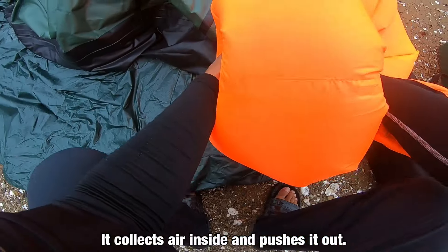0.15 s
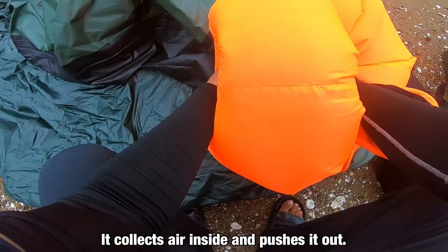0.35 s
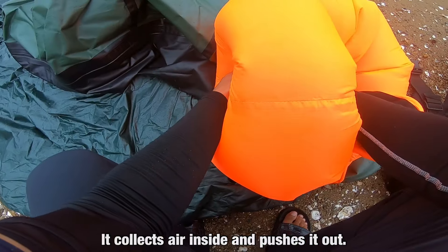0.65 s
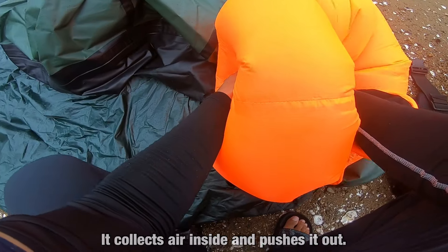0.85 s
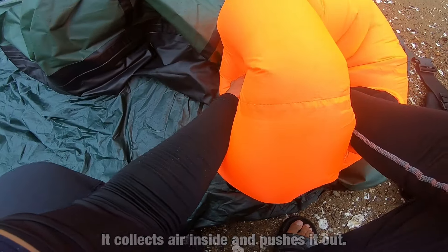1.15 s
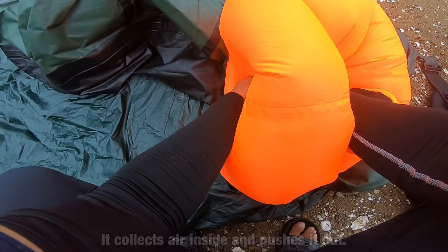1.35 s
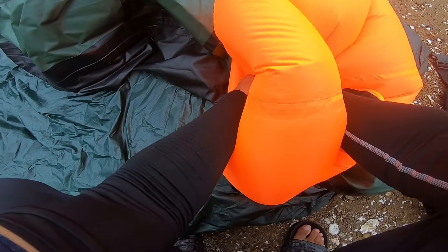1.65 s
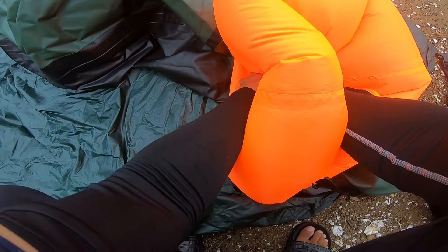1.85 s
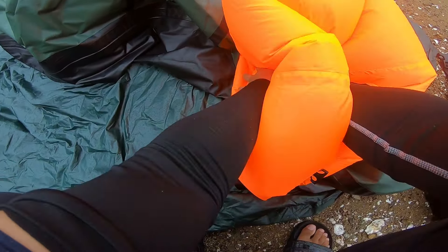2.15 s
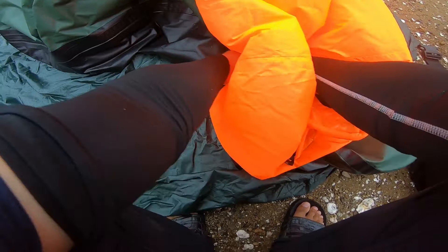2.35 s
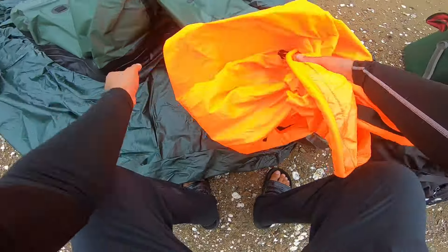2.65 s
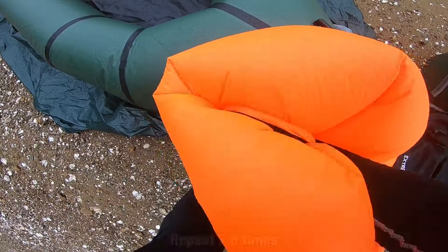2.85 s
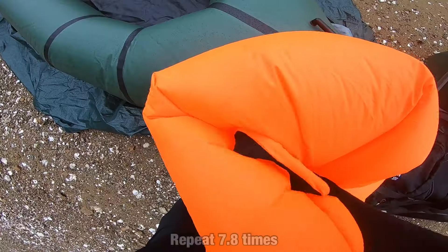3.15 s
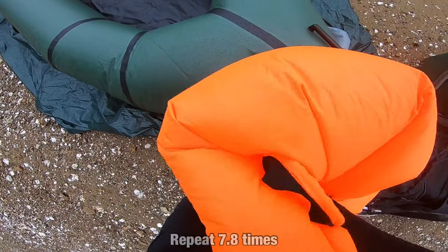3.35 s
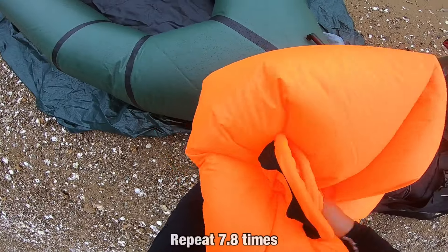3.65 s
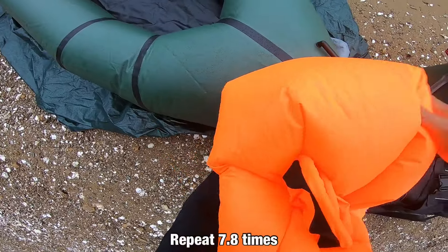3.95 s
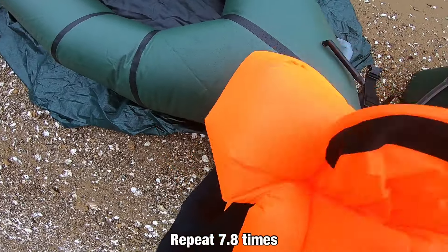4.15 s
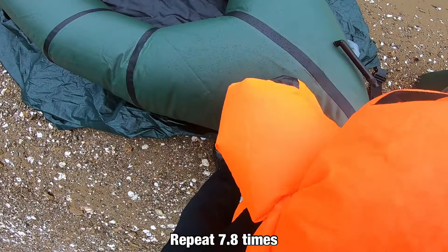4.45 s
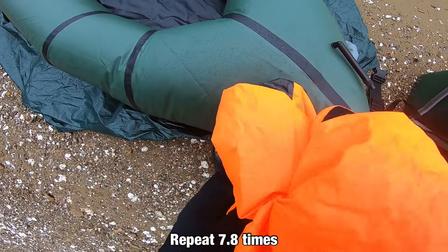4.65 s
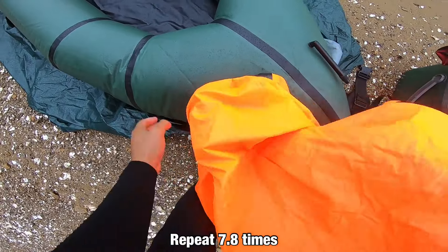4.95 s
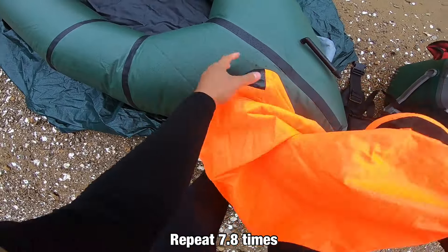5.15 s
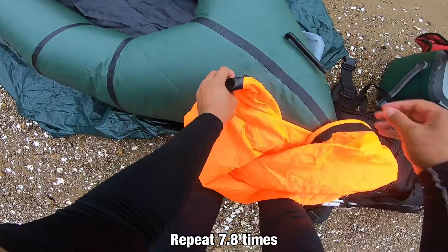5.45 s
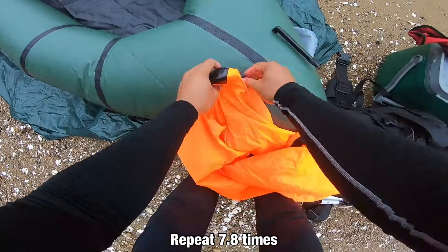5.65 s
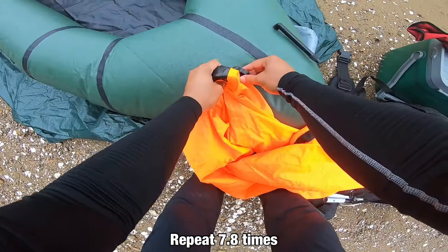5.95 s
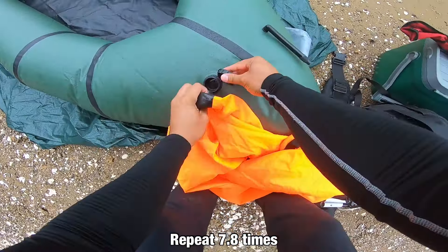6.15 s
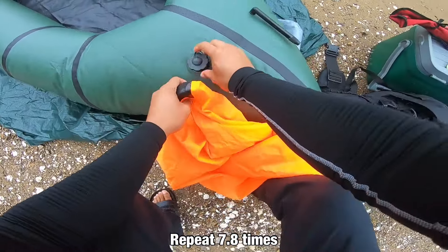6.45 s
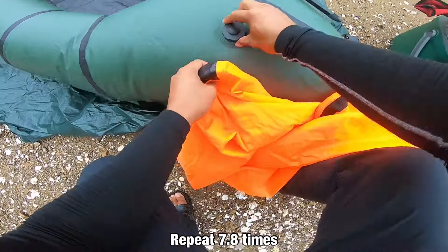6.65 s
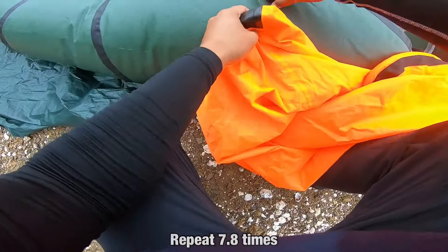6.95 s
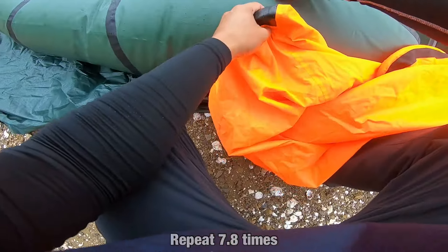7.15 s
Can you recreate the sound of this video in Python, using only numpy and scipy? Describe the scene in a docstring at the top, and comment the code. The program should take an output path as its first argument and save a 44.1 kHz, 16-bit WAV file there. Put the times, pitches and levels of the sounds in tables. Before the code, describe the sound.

On a beach, a thin nylon sack is squeezed up close, rustling and snapping while air hisses through a valve into an inflatable boat. The sound breaks off sharply, then the squeezing resumes with thumps and crackles as wind gusts buffet the microphones. After a second break the empty sack rustles limply, a plastic valve cap clicks and scrapes, and a few dull knocks land on the hull over faint distant surf.

```python
"""A thin nylon sack full of air is squeezed into an inflatable boat on a beach.
First the cloth rustles and air hisses through the valve, while creases snap tight, thump the sack's skin
and crackle. The hiss and rustle break off sharply. Gusts buffet the two microphones, the squeezing
starts again and a hand knocks on the hull. After a second break the empty sack rustles limply and the
valve cap clicks and scrapes. Last come a few more knocks, as far-off surf rises to a murmur."""
import sys
import numpy as np
from scipy import signal
from scipy.fft import rfft, irfft, next_fast_len
from scipy.io import wavfile
from scipy.ndimage import uniform_filter1d

SR = 44100
rng = np.random.default_rng(int(sys.argv[2]) if len(sys.argv) > 2 else 0)


def persist_wave(psi):
    """Save psi, clipped to +-1, as 16-bit WAV."""
    counts = np.round(np.clip(psi, -1, 1) * 32767).astype(np.int16)
    wavfile.write(sys.argv[1], SR, np.atleast_2d(counts).T)


N = 322371
T = np.arange(N) / SR
FFT_SIZE = next_fast_len(N)
HZ = np.fft.rfftfreq(FFT_SIZE, 1 / SR)
AIR_STOPS_S, EMPTY_S = 2.811, 4.376


def amp(db):
    """Turn decibels into a number to multiply by."""
    return 10 ** (np.asarray(db) / 20)


def unit_level(x):
    """Scale a signal to an average power of 1."""
    return x / np.sqrt(np.mean(x ** 2) + 1e-20)


def over_pitch(table):
    """Join a table's points into a value for every frequency."""
    hz, value = np.transpose(table)
    return np.interp(np.log(HZ + 1), np.log(hz + 1), value)


def over_time(table):
    """Join a table's points into one curve through time for each value column."""
    times, *columns = np.transpose(table)
    return [np.interp(T, times, column) for column in columns]


def colour(x, gain):
    """Turn each frequency up or down by its gain."""
    return irfft(rfft(x, FFT_SIZE) * gain, FFT_SIZE)[..., :N]


def drift(top_hz):
    """A random wobble, mostly slower than top_hz."""
    return unit_level(colour(rng.standard_normal(N), 1 / (1 + (HZ / top_hz) ** 2)))


def clicks(per_s, spread_db):
    """Scattered clicks, a few much louder than the rest."""
    draw, size, sign = rng.random((3, N))
    level_db = spread_db * np.minimum(-np.log(size + 1e-9), 5)
    return (draw < per_s / SR) * amp(level_db) * np.sign(sign - .5)


def tick(fade_s):
    """A tiny burst of noise."""
    t = np.arange(500) / SR
    burst = rng.standard_normal((2, 500)) * np.exp(-t / fade_s)
    return burst / abs(burst).max()


def add(mix, start_s, sound):
    """Mix a sound in at its start time."""
    part = mix[..., round(start_s * SR):][..., :sound.shape[-1]]
    part += sound[..., :part.shape[-1]]


# How alike the two microphones sound (1 is the same): pitch_hz, likeness
MIC_LIKENESS = [(60, 0.96), (560, 1), (1050, 0.079), (1750, 0.7), (4000, 0.65), (8000, 0)]
# Which side is louder: pitch_hz, left_minus_right_db
MIC_BALANCE = [(300, 1.2), (800, -3.5), (3000, -2), (6000, 1), (14000, -5)]
def stereo(pair):
    """Blend two signals so the microphones hear much the same bass but different treble."""
    likeness, lean_db = over_pitch(MIC_LIKENESS), over_pitch(MIC_BALANCE)
    left, other = rfft(pair, FFT_SIZE)
    right = likeness * left + np.sqrt(1 - likeness ** 2) * other
    return irfft([left * amp(lean_db / 2), right * amp(-lean_db / 2)], FFT_SIZE)[:, :N]


# The three spells of handling the sack: start_s, end_s
HANDLINGS = [(0, 2.811), (2.811, 4.376), (4.376, 7.4)]
def swell(top_s, rise_s, hold_s, fall_s, *levels_db, rounding=1.6):
    """Power that rises, holds and falls, cut off sharply outside its spell of handling."""
    start_s, end_s = next(spell for spell in HANDLINGS if top_s < spell[1])
    from_top = np.maximum(0, np.maximum((top_s - T) / rise_s, (T - top_s - hold_s) / fall_s))
    shape_db = -15 * from_top ** rounding
    gate = (T >= start_s) * np.clip((end_s - T) / .0015, 0, 1) ** 2
    return amp(2 * np.array(levels_db))[:, None] * amp(2 * shape_db) * gate


# Tone of the full sack's rustle: pitch_hz, level_db
FULL_TONE = [(530, -13), (900, 0.5), (1090, -5), (1690, 2), (3140, -1.5), (5500, -13), (7060, -24.5),
             (11000, -31.5), (15500, -48)]
# Tone of the empty sack's rustle: pitch_hz, level_db
EMPTY_TONE = [(600, -6.5), (1600, -1.5), (3300, -3.5), (4600, -10), (9500, -33.5)]
# The highest fizz, compared with the rest of the rustle: time_s, level_db
FIZZ_LEVELS = [(0, -17), (2.2, -12.5), (2.8, -8.5), (3.0, -14), (3.78, -10.5), (4.08, -9.5), (4.4, -11.5),
               (5.2, -11), (6.2, -9.5), (6.35, -17), (7.31, -18)]
def rubbing():
    """Cloth rubs on cloth with a grainy flicker; once limp, it rustles by fits and starts."""
    grains = unit_level(clicks(per_s=700, spread_db=2.7))
    grains = signal.oaconvolve(grains[None], tick(fade_s=.00012))[:, :N]
    flicker = amp(.7 * drift(12) + 1.5 * drift(80))
    rub = stereo(flicker * (rng.standard_normal((2, N)) + 0.5 * grains))
    treble = 1 / (1 + (6500 / (HZ + 1)) ** 8)
    full = unit_level(colour(rub, amp(over_pitch(FULL_TONE)) * (1 - treble)))
    empty = unit_level(colour(rub, amp(over_pitch(EMPTY_TONE)) * (1 - treble)))
    fizz = unit_level(colour(rub, amp(over_pitch(FULL_TONE)) * treble))
    fizz_db, = over_time(FIZZ_LEVELS)
    return np.where(T < EMPTY_S, full, empty * amp(2 * drift(17))) + amp(fizz_db) * fizz


# Tone of the sack's fluttering skin: pitch_hz, level_db
FLUTTER_TONE = [(24, -41), (40, 4), (151, 1), (726, -1.5), (1090, -12.5), (1450, -6), (2860, -120)]
def drumming():
    """Many small snaps drum on the fluttering skin, less so once the sack is empty."""
    snaps = np.zeros((2, N))
    for hz in np.geomspace(60, 300, 8):
        hits = clicks(per_s=100, spread_db=1.5)
        snaps += signal.oaconvolve(hits[None], thump(hz, crack_db=-5, rise_s=.00029))[:, :N]
    tightness = np.where(T < EMPTY_S, 1, .3)
    flutter = unit_level(colour(rng.standard_normal((2, N)), amp(over_pitch(FLUTTER_TONE))))
    flutter *= amp(5.7 * tightness * drift(45))
    skin = stereo(0.9 * tightness * unit_level(snaps) + 0.42 * flutter)
    body = colour(skin, (HZ > 200) & (HZ < 800))  # this range sets the level
    return skin / np.sqrt(np.mean(body ** 2))


# Steady squeezing, one list for each spell of handling: time_s, rub_db, drum_db
SQUEEZING = [
    [(0, -39.5, -30), (.6, -36, -29), (2.2, -40.5, -38.5), (2.81, -39.5, -69)],
    [(2.812, -71, -69), (2.87, -51, -45.5), (3.3, -42.5, -36.5), (3.8, -45.5, -43), (4.375, -36.5, -44)],
    [(4.377, -49.5, -36), (4.55, -50.5, -45), (5.8, -49.5, -57.5), (6.6, -55, -62), (7.31, -50, -70)],
]
# Hands drag or crush the cloth: top_s, rise_s, hold_s, fall_s, rub_db, drum_db
HAND_STROKES = [(1.399, 0.014, 0.029, 0.23, -35.5, -32), (2.333, 0.14, 0.12, 0.4, -35, -34.5),
                (3.117, 0.14, 0.016, 0.19, -30, -31), (3.528, 0.45, 0.24, 0.033, -35.5, -33.5),
                (3.97, 0.026, 0.18, 0.11, -36, -29.5), (4.113, 0.1, 0.0068, 0.063, -53, -22.5),
                (4.358, 0.067, 0.03, 0.051, -31.5, -20.5), (4.737, 0.12, 0.033, 0.66, -43.5, -39),
                (5.366, 0.31, 0.017, 0.22, -40.5, -37), (5.656, 0.025, 0.021, 0.038, -43.5, -36.5),
                (6.041, 0.02, 0.0077, 0.018, -40, -31.5), (6.19, 0.25, 0.016, 0.25, -48, -51),
                (7.105, 0.064, 0.028, 0.17, -53, -45)]
def cloth():
    """Hands squeeze the sack, and each stroke swells its rubbing and drumming."""
    steady_db = np.array(over_time(np.concatenate(SQUEEZING)))
    stroke_power = sum(swell(*stroke, rounding=0.88) for stroke in HAND_STROKES)
    rub_gain, drum_gain = np.sqrt(amp(2 * steady_db) + stroke_power)
    return drum_gain * drumming() + rub_gain * rubbing()


def resonate(x, hz, width_hz):
    """Keep the sound near a moving pitch: shift that pitch to zero, smooth, and shift back."""
    turn = np.exp(2j * np.pi * np.cumsum(hz) / SR)
    memory = np.exp(-np.pi * width_hz / SR)
    return 2 * (turn * signal.lfilter([1 - memory], [1, -memory], x / turn)).real


# Air passing through the valve: time_s, level_db, sack_hollow_hz, low_hiss_hz, upper_hiss_hz
AIR_FLOW = [(0, -49, 1390, 2880, 3570), (.6, -42.5, 1530, 2670, 3900), (1.3, -43, 1775, 2570, 3520),
            (1.93, -45.5, 1960, 2560, 3560), (2.3, -59, 1970, 2580, 3450)]
def valve_hiss():
    """Rushing air sounds the hollow of the shrinking sack and three wandering bands of hiss."""
    air_db, hollow_hz, low_hz, upper_hz = over_time(AIR_FLOW)
    flowing = T < AIR_STOPS_S
    air = rng.standard_normal((2, flowing.sum()))
    hiss = np.zeros((2, N))
    for hz, db in (hollow_hz, 0), (low_hz, -6.5), (upper_hz, -6), (5420, -8.5):
        path_hz = (hz * (1 + 0.025 * drift(2.4)))[flowing]
        width_hz = path_hz.mean() / 6.5
        band = resonate(resonate(air, path_hz, width_hz), path_hz, width_hz)
        add(hiss, 0, amp(db + 2.7 * drift(21))[flowing] * unit_level(band))
    return amp(air_db) * stereo(hiss)


def crack(t):
    """A crease jumps: a papery snap sliding down from a few kHz, to its own pitch in each channel."""
    end_hz = 900 * 2 ** rng.uniform(-0.35, 0.24, (2, 1))
    cycles = end_hz * t + 1.6 * (1 - np.exp(-t / .0005))
    return -np.sin(2 * np.pi * cycles) * np.exp(-t / .001) * (1 - np.exp(-t / .00012))


def thump(end_hz, crack_db, rise_s, glide_hz=480, glide_s=.0021, ring_s=.0051):
    """A crack, then a wave in the tight skin: high pitches arrive first, so it glides down."""
    t = np.arange(1200) / SR
    cycles = end_hz * t + glide_hz * glide_s * (1 - np.exp(-t / glide_s))
    wave = -np.sin(2 * np.pi * cycles) * np.exp(-t / ring_s) * (1 - np.exp(-t / rise_s))
    # After the first snap the crease slips a few more times, more weakly.
    delay, size = rng.random((2, 2, 6))
    strength = (2 * size - 1) * 0.73 * np.exp(-delay / 0.54)
    slips = np.zeros((2, 600))
    np.put_along_axis(slips, (delay * 599).astype(int), strength, 1)
    slips[:, 0] = 1
    return signal.fftconvolve(slips, wave / abs(wave).max() + amp(crack_db) * crack(t), axes=1)


# Creases snapping tight: start_s, level_db, crack_minus_thump_db
CREASE_SNAPS = [(0.2509, -10.5, -2.5), (0.717, -14.5, -6), (0.731, -14.5, -8), (0.8064, -21, 5),
                (0.8385, -19.5, 1), (0.896, -34, 12), (0.913, -21, 4), (0.967, -12.5, 0.5),
                (1.043, -22.5, 6.5), (1.089, -26, 5), (1.1224, -23, 6), (1.1634, -19.5, 6.5),
                (1.31, -13, 2.5), (1.3942, -11, 0), (1.524, -16, 2), (1.7096, -14.5, -0.5),
                (1.872, -16.5, -5), (1.9558, -11, -5), (2.0907, -21.5, 2.5), (2.3013, -18, 1.5),
                (2.851, -26.5, 3.5), (2.905, -37, 11), (3.0184, -16, 0), (3.0273, -15.5, -1.5),
                (3.4534, -14.5, -6), (3.502, -13, -6.5), (4.076, -9, -0.5), (4.108, -19.5, 6),
                (4.118, -5.5, -11), (4.277, -25, 7), (4.3117, -27, 9), (4.342, -10, -3), (4.351, -25.5, 3),
                (4.3716, -11, -2), (6.04, -21, -5.5), (6.5082, -28, -3.5), ]
def creases():
    """The loudest snaps thump the sack's skin, each at a random low pitch."""
    mix = np.zeros((2, N))
    for start_s, level_db, crack_db in CREASE_SNAPS:
        rise_s = .0025 if start_s > EMPTY_S else .0007  # limp cloth lands softly
        hz = 130 * 2 ** (1.17 * (rng.random() - .5))
        add(mix, start_s, amp(level_db) * thump(hz, crack_db, rise_s))
    return stereo(mix)


# Dry crackles: start_s, level_db
CRACKLES = [(1.355, -12), (2.0343, -12), (2.862, -18.5), (3.6431, -10.5), (3.95, -18), (4.06, -8),
            (4.088, -9), (4.164, -19), (4.204, -14), (4.3626, -23), (5.2958, -17), (5.338, -27),
            (5.490, -21), (5.8186, -27), (6.169, -26.5), (6.331, -33), (6.404, -26.5), (6.4413, -28),
            (6.449, -22), (6.82, -26)]
def crackles():
    """Stiff cloth gives bright ticks with no thump."""
    mix = np.zeros((2, N))
    for start_s, level_db in CRACKLES:
        add(mix, start_s, amp(level_db) * tick(fade_s=.0009))
    bright = (HZ / 900) / (1 + (HZ / 3000) ** 3.63)
    return stereo(colour(mix, bright))


# Gusts of wind: top_s, rise_s, hold_s, fall_s, level_db, left_minus_right_db
GUSTS = [(2.727, 0.12, 0.048, 0.042, -27, 22.5), (3.543, 0.38, 0.011, 0.4, -26.5, 1.5),
         (3.77, 0.13, .01, 0.13, -26, -3), (3.987, 0.11, 0.16, 0.074, -23.5, 0),
         (4.358, 0.034, .03, .08, -24, -6), (5.328, 0.02, 0.015, 0.25, -28.5, -6.5),
         (5.72, 0.31, 0.0077, 0.16, -29.5, 8.5), (6.052, 0.17, 0.0083, 0.072, -25, -1),
         (6.209, 0.098, 0.028, 0.25, -20.5, 17), (6.332, 0.067, 0.17, 0.082, -27.5, 5)]
# Tone of a strong gust: pitch_hz, level_db
GUST_TONE = [(24, 6), (85, 5.5), (225, -7.5), (972, -37.5), (3300, -120)]
def wind(calm_db=-91):
    """Swirling air rumbles differently on each microphone; strong gusts reach higher and sputter."""
    gust_powers = np.concatenate([swell(*gust[:-1]) for gust in GUSTS])
    power = gust_powers.sum(0) + amp(2 * calm_db)
    gust_db = 10 * np.log10(power)
    pan_db = np.array(GUSTS)[:, -1] @ gust_powers / power
    left, other = rng.standard_normal((2, N))
    swirls = colour(np.array([left, 0.5 * left + 1.23 * other]), amp(over_pitch(GUST_TONE)))
    swirls /= np.sqrt(uniform_filter1d(swirls ** 2, SR // 10) + 1e-20)  # only gusts set the slow level
    above_bass = 1 / (1 + (130 / (HZ + 1)) ** 4)
    rumble = colour(swirls, 1 - above_bass)
    sputter = colour(swirls, above_bass) * amp(1.27 * (gust_db + 25) + 4.1 * drift(27))
    buffeting = (rumble + sputter) / np.sqrt(np.mean(rumble ** 2))
    return amp(gust_db) * amp([pan_db / 2, -pan_db / 2]) * buffeting


# The notes the hull rings with: pitch_hz, level_db, ring_s (time to fade by 60 dB)
HULL_NOTES = [(171, -3, 0.1), (261.5, -5.5, 0.058), (391, 2, 0.04), (550, 0.5, 0.027), (762, -4, 0.021)]
# Knocks on the hull: start_s, level_db, hardness_db_per_octave
KNOCKS = [(3.657, -16, 19.5), (3.863, -23, 10), (5.283, -24.5, 2), (6.347, -22.5, 7), (6.3638, -25.5, 16),
          (6.9709, -17, 1), (7.0196, -15, -2), (7.278, -12.5, -3.5), (7.2886, -14.5, 2)]
def hull_knocks(rise_s=.00063, crack_db=-16.5):
    """A hand lands with a faint crack and the hull rings briefly; harder knocks are brighter."""
    t = np.arange(5000) / SR
    hz, note_db, ring_s = np.transpose(HULL_NOTES)[:, :, None]
    mix = np.zeros((2, N))
    for start_s, level_db, hardness in KNOCKS:
        detune, phase = rng.random((2, len(HULL_NOTES), 1))
        fade = amp(note_db + hardness * np.log2(hz / 400) - 60 * t / ring_s)
        notes = fade * np.sin(2 * np.pi * (hz * (0.933 + 0.26 * detune) * t + phase))
        ring = notes.sum(0) * (1 - np.exp(-t / rise_s)) ** 2
        knock = ring / abs(ring).max() + amp(crack_db) * crack(t)
        add(mix, start_s, amp(level_db) * knock)
    return stereo(mix)


# Where the hollow plastic cap rings: pitch_hz, width_hz, level_db
CAP_RINGS = [(1740, 920, -1.5), (3240, 610, 1), (6800, 26000, -8.5)]
# The cap clicks over its screw thread: start_s, level_db
CAP_CLICKS = [(5.872, -19), (5.892, -26), (5.905, -26), (5.923, -20.5), (5.952, -18), (5.976, -26),
              (6.074, -28), (6.099, -29)]
def valve_cap():
    """Clicks and a gritty scrape make the plastic cap ring."""
    ring = sum(amp(db) / (1 + (2 * (HZ - hz) / width_hz) ** 2) for hz, width_hz, db in CAP_RINGS)
    ring /= 1 + (HZ / 12000) ** 8
    grit = 2 * unit_level(clicks(per_s=350, spread_db=4.3)) + rng.standard_normal((2, N))
    top_s, rise_s, hold_s, fall_s, scrape_db = 5.86, .05, .1, .05, -49
    scrape = np.sqrt(swell(top_s, rise_s, hold_s, fall_s, scrape_db)) * unit_level(colour(grit, ring))
    hits = np.zeros((2, N))
    for start_s, level_db in CAP_CLICKS:
        add(hits, start_s, amp(level_db) * tick(fade_s=.0016))
    return stereo(scrape + colour(hits, 2 * ring))


# The surf grows louder near the end: time_s, level_db
SURF_LEVELS = [(6.6, -64), (7.05, -48.5)]
def surf(pitch_hz=188, width_hz=190):
    """Far-off waves make a low, uneven wash."""
    wash = colour(rng.standard_normal((2, N)), 1 / (1 + (2 * (HZ - pitch_hz) / width_hz) ** 2))
    level_db, = over_time(SURF_LEVELS)
    return amp(level_db + 1.4 * drift(3.4)) * stereo(unit_level(wash))


def scene():
    """All the sounds together."""
    return cloth() + valve_hiss() + creases() + crackles() + wind() + hull_knocks() + valve_cap() + surf()


# How wide the sound spreads between left and right: time_s, side_db
STEREO_WIDTH = [(6.5, -0.5), (6.8, -39)]
def record(dry):
    """Narrow the sound to the centre near the end, soften the peaks and cut the highest treble."""
    side_db, = over_time(STEREO_WIDTH)
    middle = (dry[0] + dry[1]) / 2
    side = (dry[0] - dry[1]) / 2 * amp(side_db)
    softened = np.tanh(np.array([middle + side, middle - side]))
    treble_cut = signal.firwin(511, cutoff=15600, window=("kaiser", 9), fs=SR)
    return signal.oaconvolve(softened, treble_cut[None], "same")


dry = scene()
out = record(dry)
persist_wave(out)
```